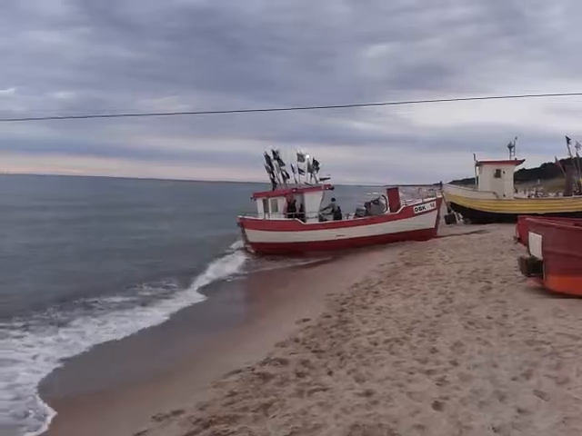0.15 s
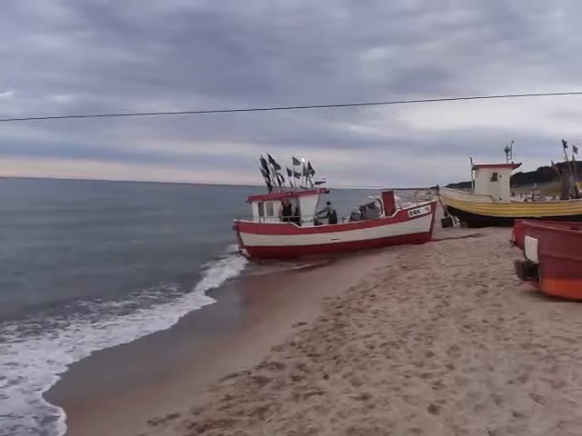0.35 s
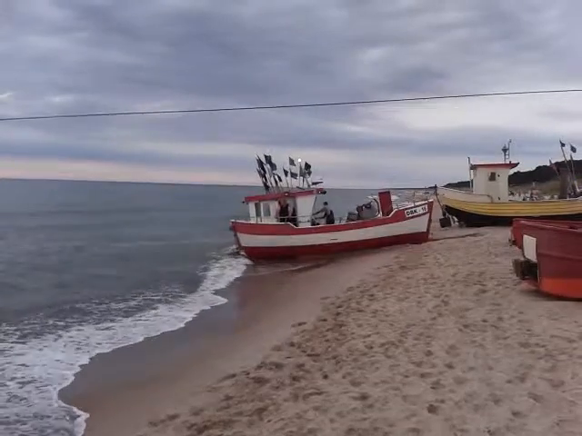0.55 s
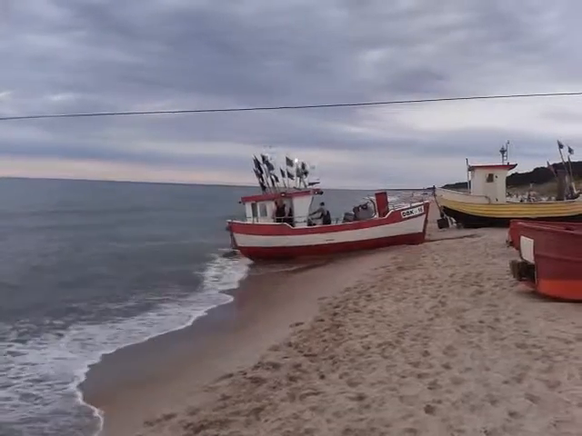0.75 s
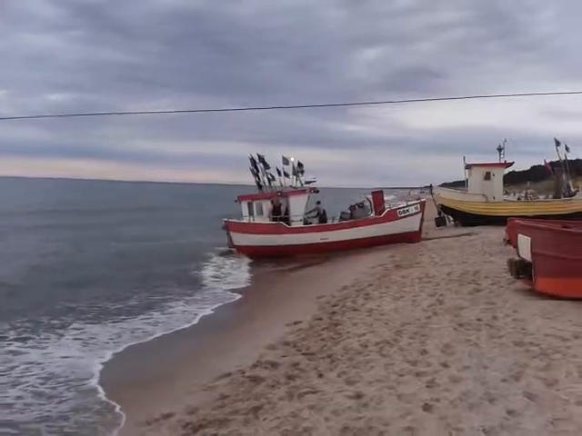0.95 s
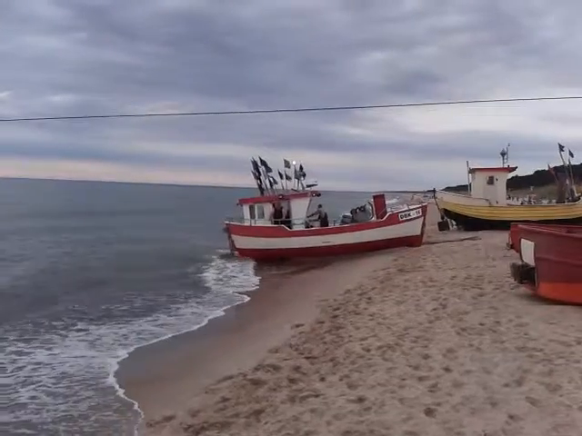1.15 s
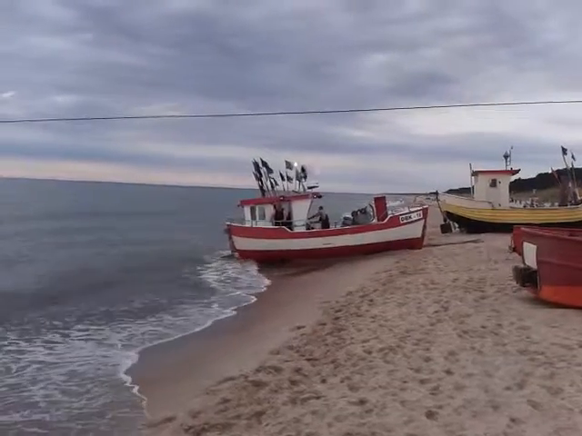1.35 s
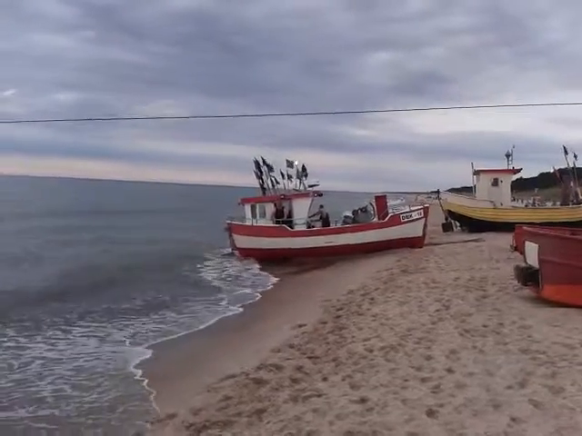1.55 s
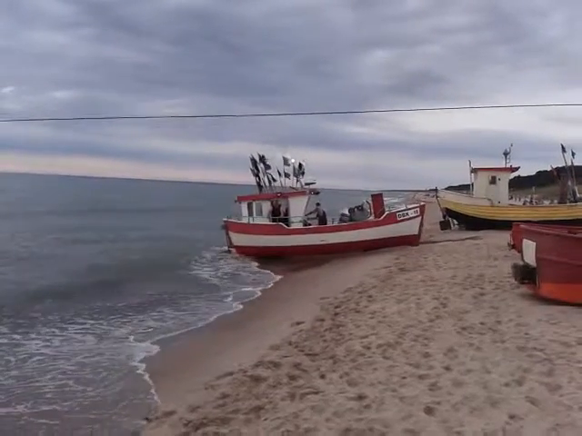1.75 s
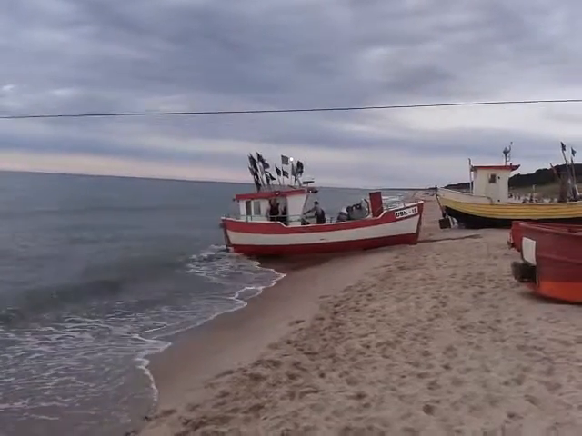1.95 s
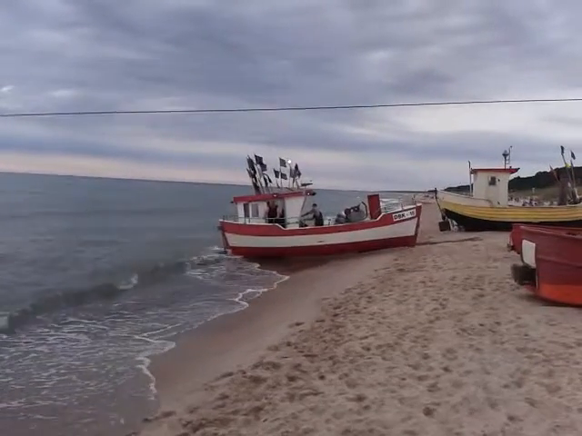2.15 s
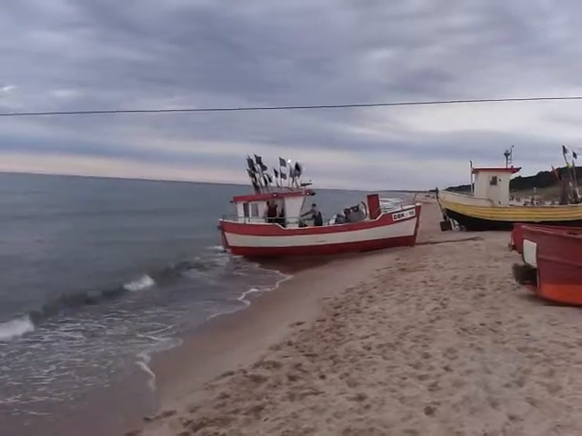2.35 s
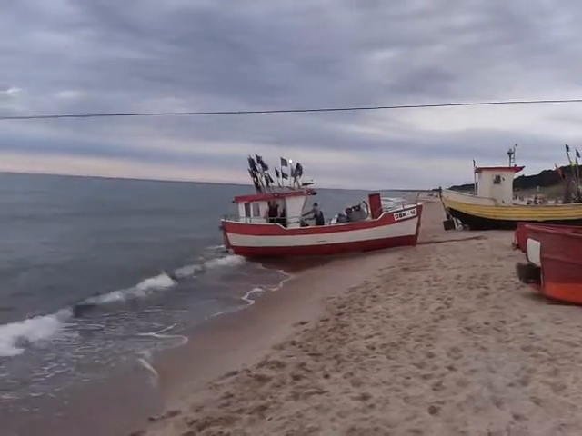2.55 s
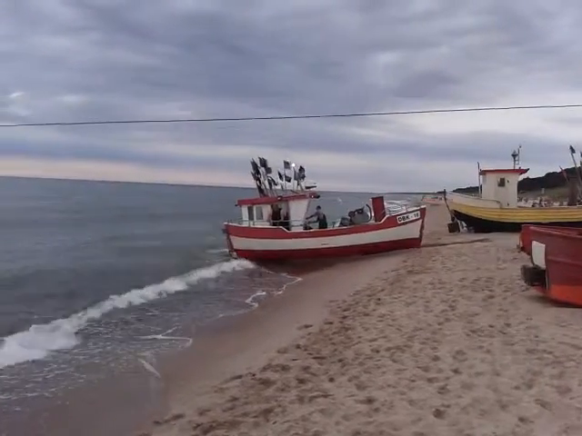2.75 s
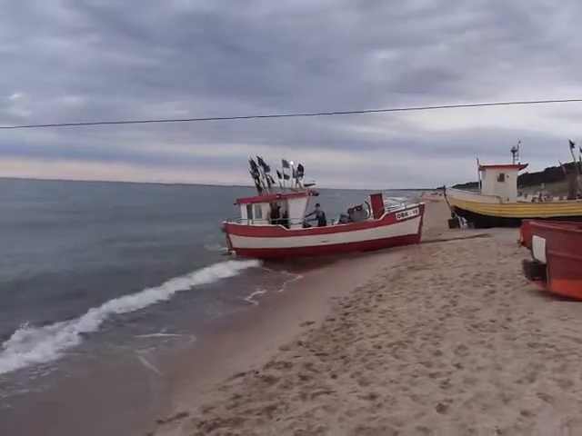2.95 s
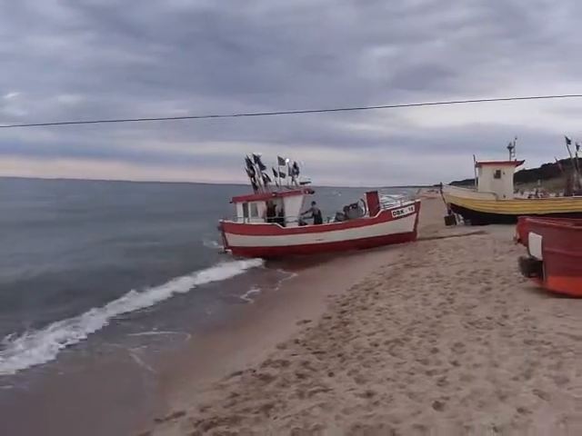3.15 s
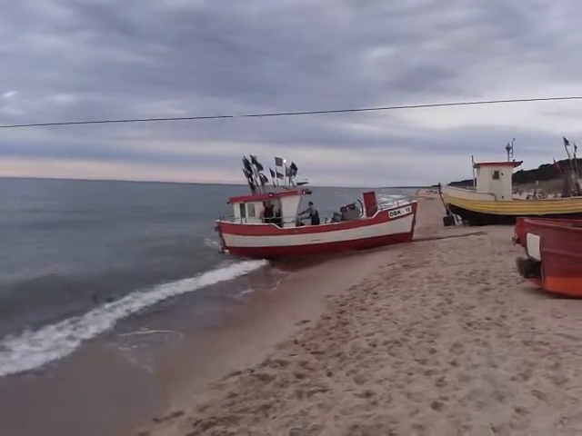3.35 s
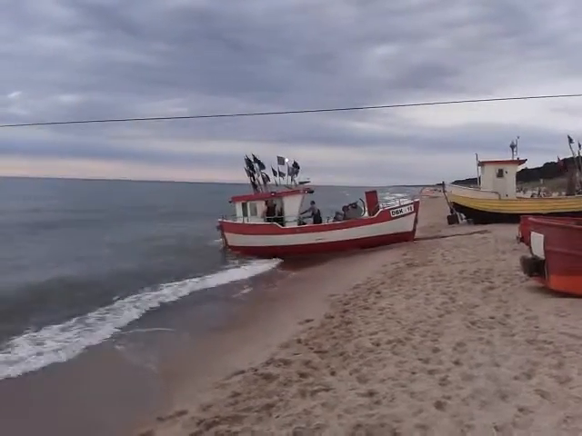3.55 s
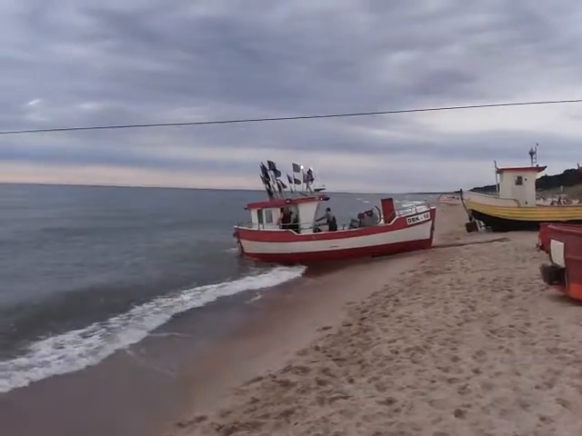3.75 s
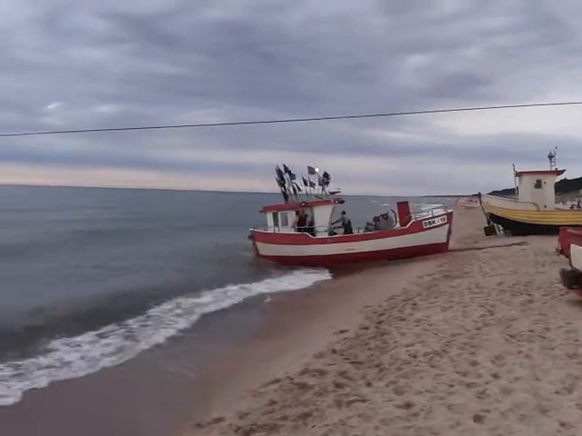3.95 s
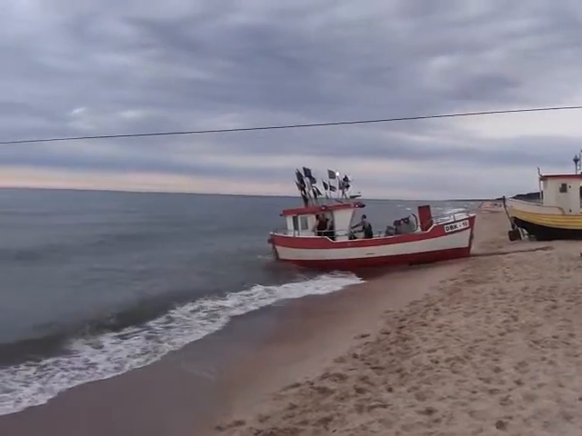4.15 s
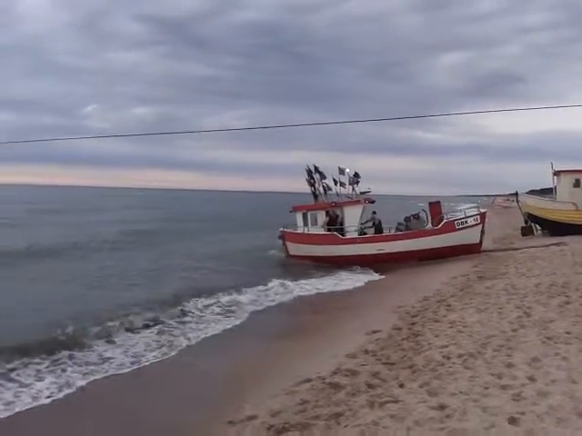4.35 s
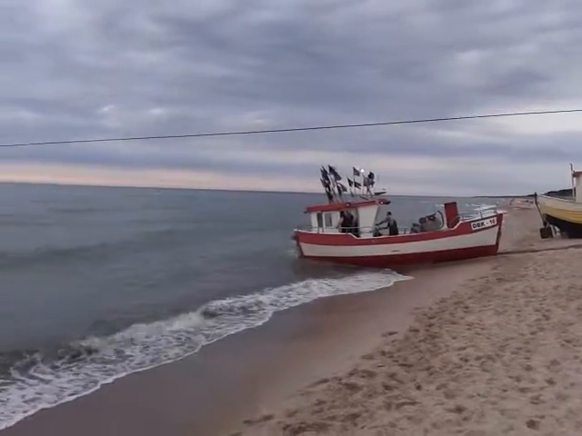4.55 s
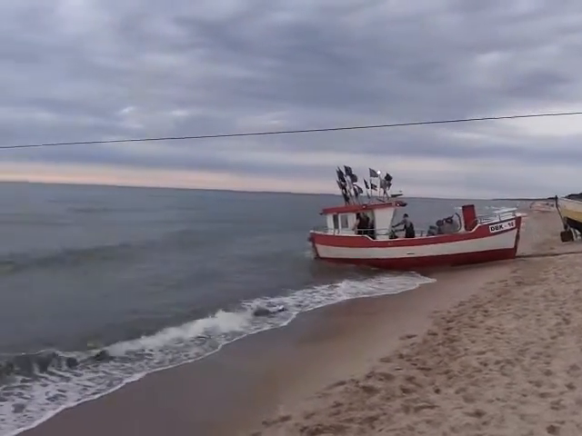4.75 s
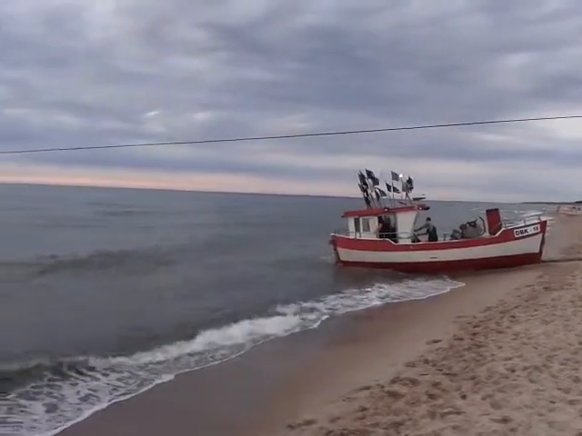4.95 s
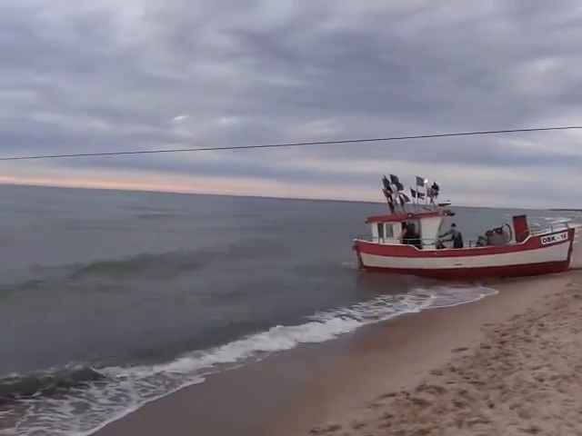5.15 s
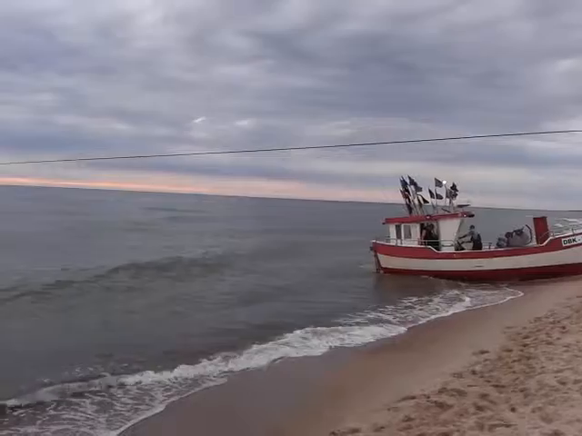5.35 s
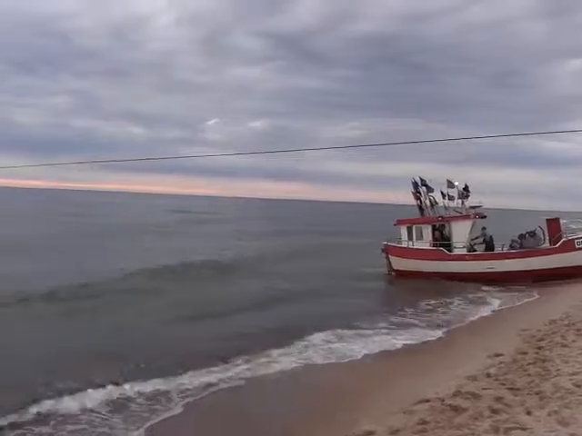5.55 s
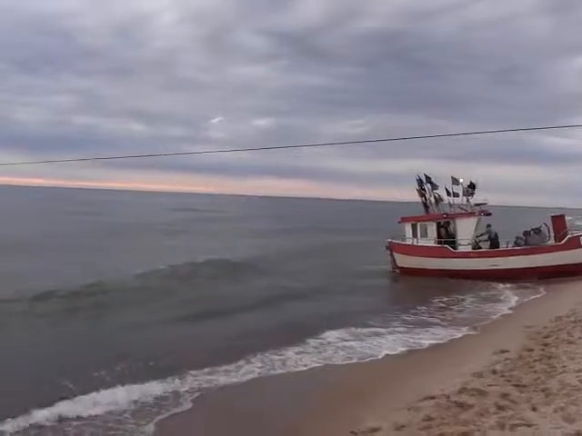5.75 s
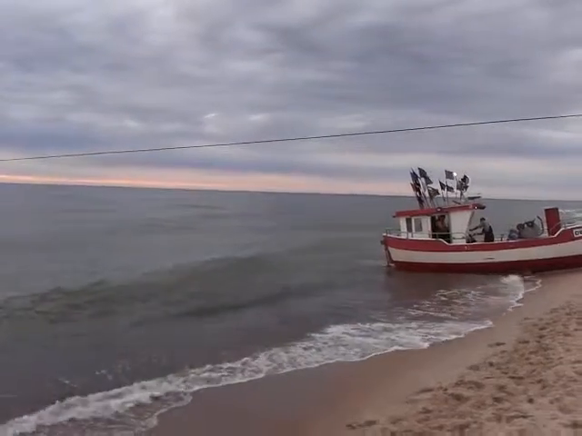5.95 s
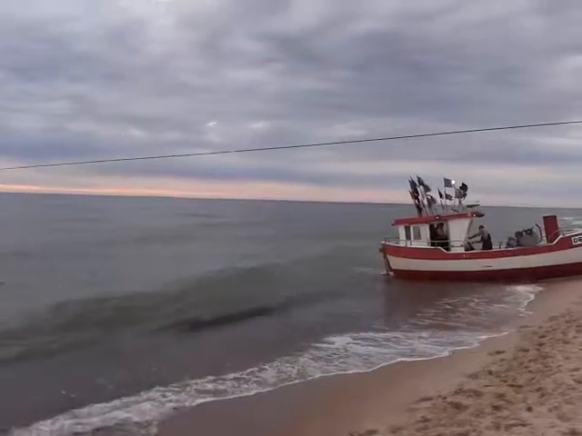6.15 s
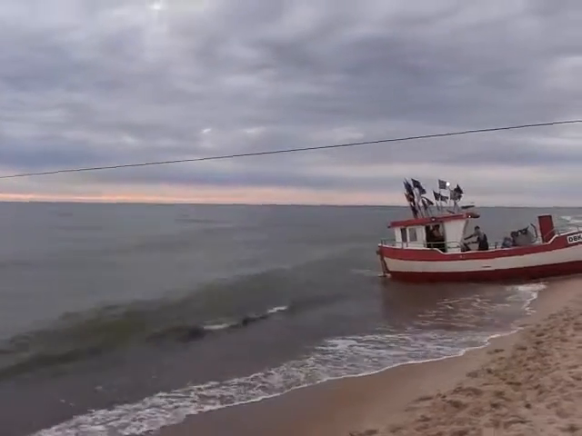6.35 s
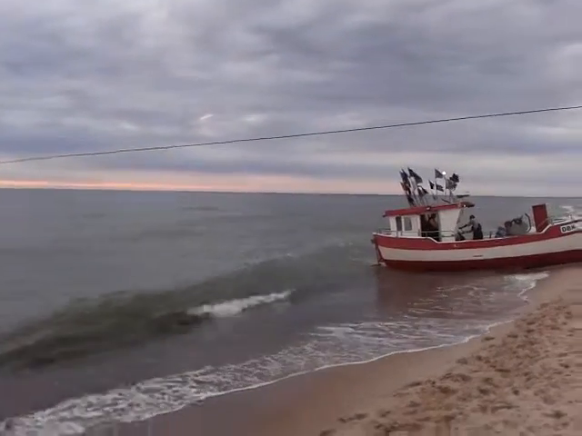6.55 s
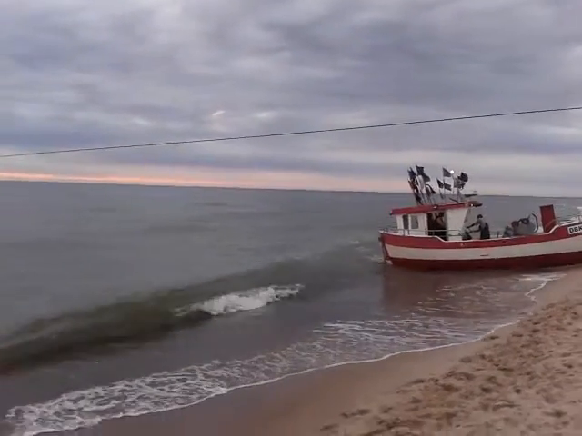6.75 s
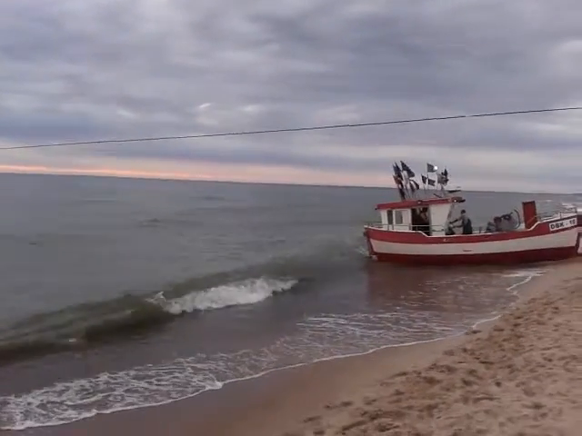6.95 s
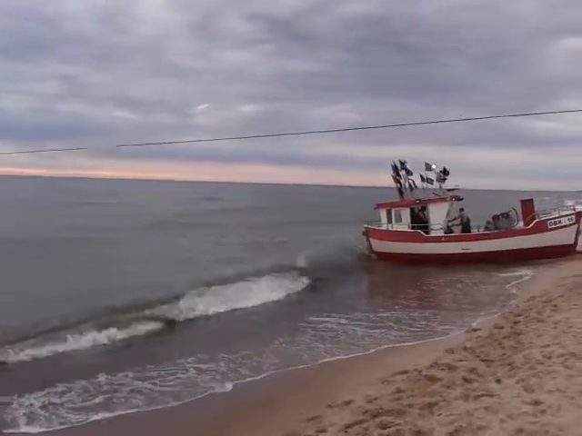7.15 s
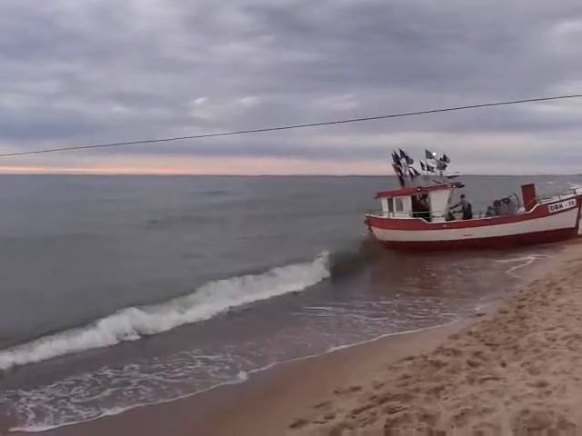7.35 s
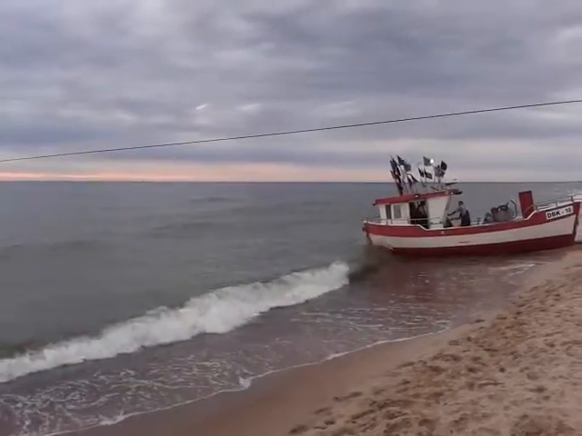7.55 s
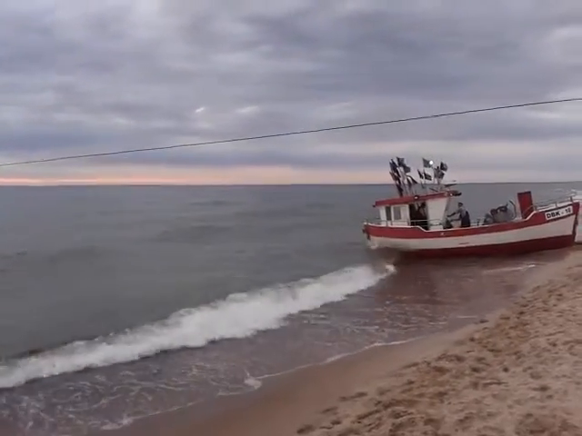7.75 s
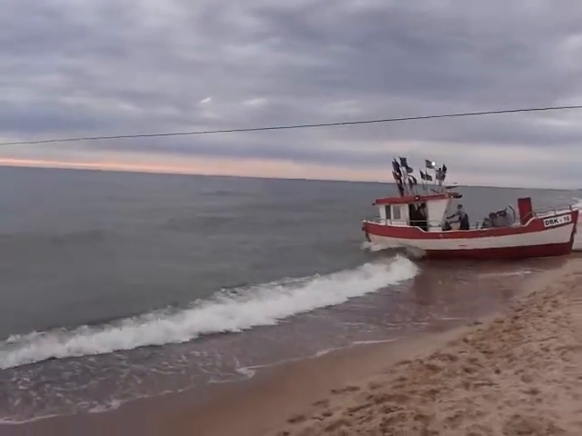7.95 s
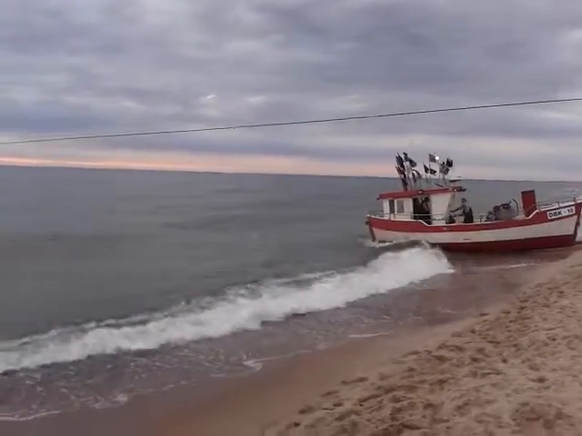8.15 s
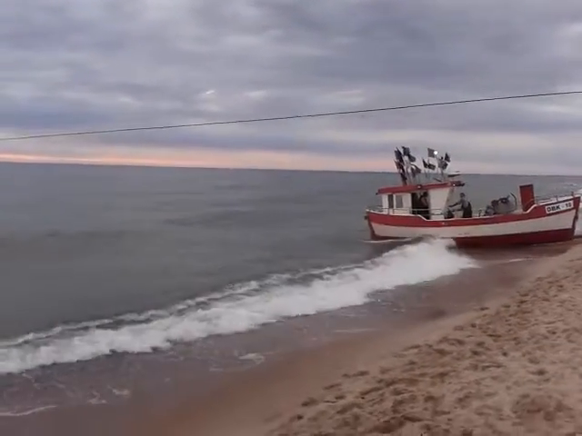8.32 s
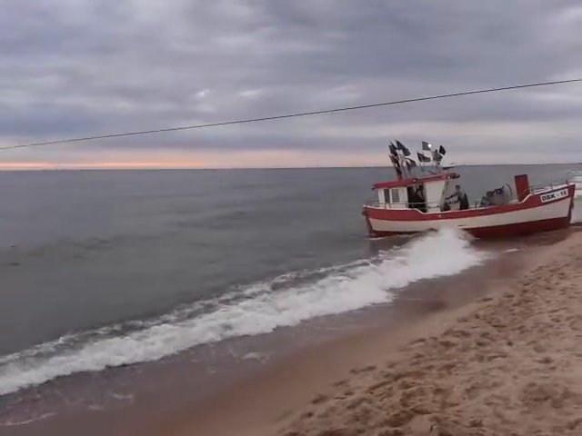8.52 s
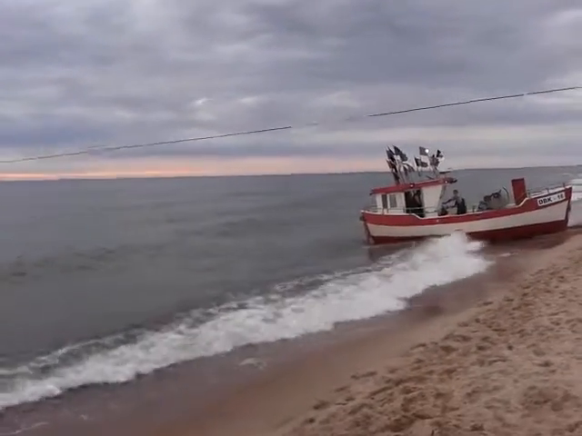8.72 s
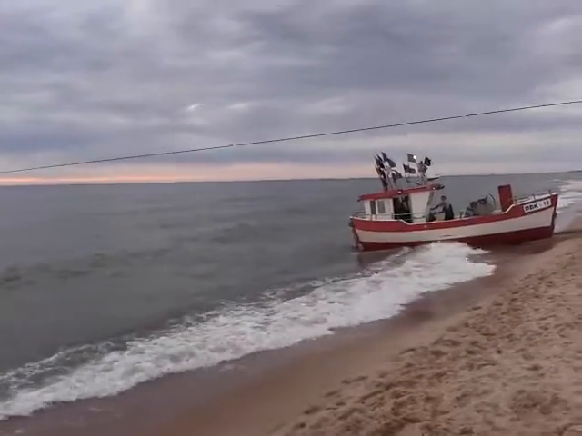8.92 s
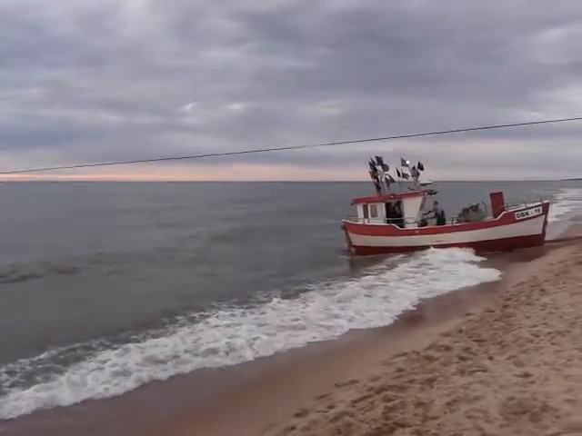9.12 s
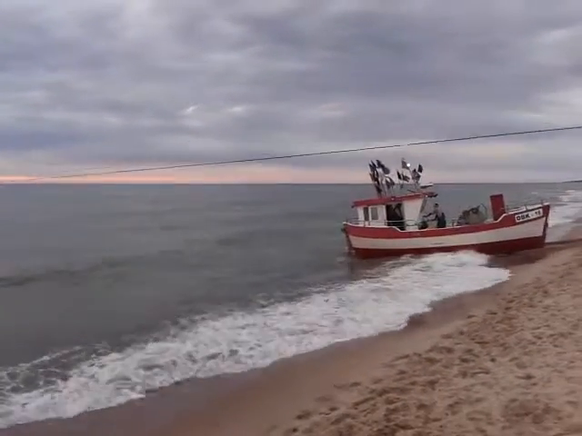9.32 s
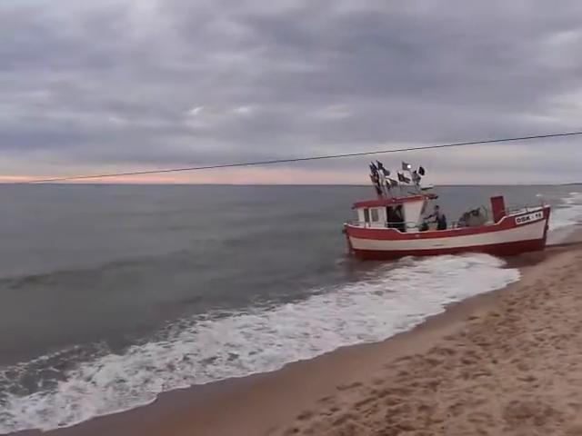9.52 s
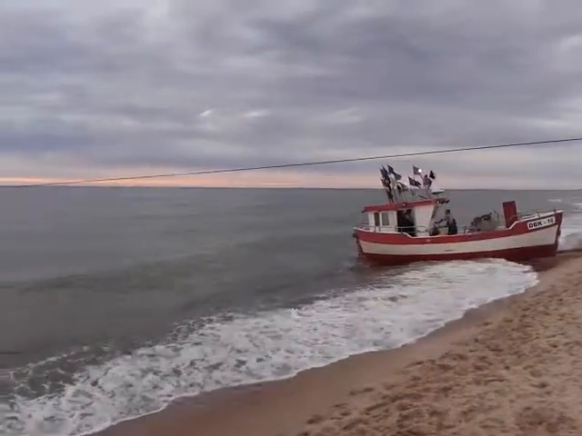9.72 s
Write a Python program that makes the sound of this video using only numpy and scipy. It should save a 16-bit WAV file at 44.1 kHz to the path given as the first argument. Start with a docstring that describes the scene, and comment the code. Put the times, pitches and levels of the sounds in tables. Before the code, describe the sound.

Outdoors on a sandy beach, a small microphone hears modest waves and wind. From 0 to 2 seconds the surf is quiet, a patchy, airy hiss with a soft roar, touched by a few light wind puffs and dull bumps. At about 2.3 seconds comes a sharper puff; from 2.7 to 3.4 a wave breaks in a fuller wash, then drains away, with a cluster of wind thumps around 3.2 to 3.6. After a short lull, wind strikes the microphone from just after 4 seconds: dense, uneven buffeting, hollow low-mid knocks, fluttering and small snaps, far louder than before. Gusts continue almost without pause. Another breaker swells around 6.6 to 8.5, its hiss partly masked, then recedes. Battering lasts until about 9.6, easing slightly at the end. A very faint deep rumble lies underneath; the sound is centred, thin-bassed and slightly ringing in the treble.

```python
"""Small waves break and run up a sandy beach: bands of patchy noise roar, hiss and drain away.
From the fourth second the small microphone faces the wind, after only a few earlier puffs;
random jolts and swinging thumps are the eddies on its port, over a faint deep rumble.
One capsule feeds both channels; its port rings near 3.5 and 5.4 kHz and the bass is cut."""
import sys
import numpy as np
from scipy import signal
from scipy.fft import rfft, irfft
from scipy.io import wavfile
from scipy.ndimage import uniform_filter1d

SR = 44100
rng = np.random.default_rng(int(sys.argv[2]) if len(sys.argv) > 2 else 0)


def put_to_file(sound):
    """Save the sound as 16-bit audio at rate SR, in the file named by the first command-line argument."""
    columns = np.atleast_2d(sound).T  # one column per channel
    safe = np.clip(columns, -1, 1)
    whole_steps = np.round(safe * 32767)
    wavfile.write(sys.argv[1], SR, whole_steps.astype(np.int16))


N = 435708

BASS_CUT_HZ = 128   # for all wind on the port


def from_db(db):
    """Decibels to gain."""
    return 10 ** (np.asarray(db) / 20)


def rms_one(x):
    """Scale to unit power."""
    return x / np.sqrt(np.mean(x ** 2) + 1e-20)


def in_time(rows):
    """Each column of a curve, sample by sample."""
    s, *columns = np.transpose(rows)
    return [np.interp(np.arange(N) / SR, s, c) for c in columns]


def butter(x, hz, kind, order):
    """Causal Butterworth filter."""
    return signal.sosfilt(signal.butter(order, hz, kind, fs=SR, output="sos"), x)


def drift(rate_hz):
    """Slow chance: noise at every 20th sample through a double one-pole low-pass; rms about 1."""
    r = np.exp(-2 * np.pi * rate_hz * 20 / SR)
    noise = rng.standard_normal(N // 20 + 4002)
    slow = signal.lfilter([1], [1, -2 * r, r * r], noise)[4000:]   # skip the settling
    return np.interp(np.arange(N) / 20, np.arange(len(slow)), rms_one(slow))


def wind_level():
    """Wind level in dB: each gust rises fast, holds and falls back into the steady wind."""
    # steady wind on the port, between the gusts: start_s [s], level_db [dB]
    steady_wind = [(0.0, -38), (0.15, -34), (0.7, -38), (1.7, -41), (2.3, -43), (2.78, -25.5),
                   (3.05, -28.5), (3.6, -36), (4.2, -62), (4.35, -25.5), (5.0, -23.5), (5.5, -22.5),
                   (6.05, -28), (6.4, -42), (6.9, -26), (7.5, -29), (8.0, -25), (9.3, -19.5), (9.74, -26),
                   (9.88, -23.5)]
    # gusts: start_s [s], hold_s [s], start_db [dB], end_db [dB]
    gusts = [(0.758, 0.087, -37, -35), (1.782, .03, -34.5, -52), (1.997, 0.05, -34, -33.5),
             (2.274, 0.017, -24.5, -43), (3.111, .01, -17.5, -29), (3.443, 0.1, -29, -29),
             (3.8, .02, -44, -50), (4.054, 0.064, -29, -47), (4.21, 0.11, -34.5, -22.5),
             (4.412, 0.14, -41, -18), (4.554, 0.18, -19, -29), (4.757, 0.096, -22, -15.5),
             (5.066, 0.077, -26, -15), (5.188, 0.16, -22, -19.5), (5.474, 0.24, -26, -20),
             (5.75, 0.1, -22.5, -18), (5.927, 0.071, -20.5, -18.5), (6.077, 0.25, -20, -21),
             (6.414, 0.17, -17, -23.5), (6.567, 0.29, -18.5, -28.5), (6.934, 0.21, -23.5, -22),
             (7.174, 0.308, -18.5, -18), (7.533, 0.26, -14, -19.5), (7.848, 0.057, -14, -20.5),
             (7.947, 0.41, -13, -23), (8.315, 0.2, -24, -16.5), (8.585, 0.074, -18, -14.5),
             (8.747, 0.16, -17, -16.5), (9.05, 0.14, -20, -16.5), (9.342, 0.022, -16, -31),
             (9.4, 0.14, -20, -18), (9.54, 0.12, -22.5, -22.5)]
    rise_db_per_s, fall_db_per_s = 497, 348
    t = np.arange(0, N, 20) / SR
    power = 0
    for start_s, hold_s, start_db, end_db in gusts:
        held_db = np.interp(t, [start_s, start_s + max(hold_s, 1e-3)], [start_db, end_db])
        before_db = rise_db_per_s * np.maximum(start_s - t, 0)
        after_db = fall_db_per_s * np.maximum(t - start_s - hold_s, 0)
        power = power + from_db(2 * (held_db - before_db - after_db))   # doubled dB: power
    power = np.interp(np.arange(N) / SR, t, power) + from_db(2 * in_time(steady_wind)[0])
    return 10 * np.log10(power)


def rumble():
    """A faint deep rumble under everything: low noise that grows with the wind."""
    level_db = uniform_filter1d(wind_level(), size=SR // 12)
    deep = butter(rng.standard_normal(N), [16, 48], "band", order=2)
    return from_db(-67 + 0.33 * (level_db + 20)) * rms_one(deep)   # -67 dB in a -20 dB wind


def ringing():
    """Soft jolts at random, dealt to ten short resonances spread over the wind's range; rms 1."""
    jolts_per_s, decay_cycles = 110, 8.8   # cycles to fall 60 dB
    passing = rng.random(N) < jolts_per_s / SR
    jolts = passing * from_db(2.46 * rng.standard_normal(N)) * rng.choice([-1, 1], N)
    dealt = rng.integers(0, 10, N)
    out = 0
    for k, hz in enumerate(np.geomspace(280, 850, 10)):
        r = from_db(-60 * hz / (decay_cycles * SR))
        w = 2 * np.pi * hz / SR
        rung = signal.lfilter([np.sin(w)], [1, -2 * r * np.cos(w), r * r], jolts * (dealt == k) + 1e-18)
        out = out + butter(rung, 1.93 * hz, "low", order=2)
    return rms_one(out)


def buffeting():
    """Turbulence: eddies pass the port as clumped, uneven pressure jolts; small eddies sound higher."""
    # large to small eddies: top_hz [Hz], level_db [dB], gust_lift [dB per dB of gust]
    eddy_sizes = [(290, -0.5, 0), (480, 2, -0.5), (740, -5.5, 1.1), (1130, -10.5, 0.42)]
    # slow air sheds more large, deep eddies: start_s [s], large_db [dB above the usual]
    large_eddies = [(0, -19), (0.8, -13), (2.2, 12), (2.8, -14), (3.5, -3), (4, 20), (4.6, 5), (6.2, 3),
                    (7.5, 3), (8.8, -6.5), (9.88, 8)]
    eddies_per_s, low_cut_hz, ringing_db = 650, 304, 4   # typical rate; ringing in the strongest wind
    level_db = wind_level()
    large_db, = in_time(large_eddies)
    sizes = from_db(0.84 * np.minimum(rng.exponential(1, N), 4)) * rng.choice([-1, 1], N)
    passing = rng.random(N) < eddies_per_s * from_db(3.0 * drift(50)) / SR
    jolts = sizes * passing + 1e-18
    kind = rng.integers(0, len(eddy_sizes), N)
    gust_db = level_db - uniform_filter1d(level_db, size=SR // 2)   # above the half-second mean
    eddies = 0
    for k, (top_hz, size_db, gust_lift) in enumerate(eddy_sizes):
        of_this_size = rms_one(butter(jolts * (kind == k), top_hz, "low", order=4))
        # gusts sharpen the small eddies
        eddy_db = size_db + large_db * (k == 0) + gust_lift * gust_db + 2.0 * drift(8.9)
        eddies = eddies + from_db(eddy_db) * of_this_size
    # a light breeze hardly rings
    eddies = eddies + from_db(ringing_db + 0.38 * (level_db - level_db.max())) * ringing()
    eddies = butter(eddies, low_cut_hz, "high", order=2)
    return from_db(level_db) * rms_one(butter(eddies, BASS_CUT_HZ, "high", order=3))


def thumps():
    """A strong eddy swings the diaphragm through a cycle or two, with a short snap at its peak."""
    # strongest single eddies, ahead of the bass cut:
    # start_s [s, near the peak], peak_db [dB], pitch_hz [Hz], snap_db [dB above the peak]
    strong_eddies = [(0.575, -21, 480, -6), (0.758, -19, 320, -14), (0.841, -22.5, 230, -27),
                     (0.849, -17, 420, -20), (1.521, -27, 260, -20), (1.78, -22, 262, -11),
                     (1.831, -22, 432, -12), (1.95, -21, 290, -13), (2.014, -16, 272, -11),
                     (2.033, -26, 525, -8), (2.271, -10, 393, -14), (3.224, -9.5, 324, -15),
                     (3.315, -3, 476, -28), (3.452, -10.5, 447, -32), (3.475, -8, 490, -25),
                     (3.509, -5, 373, -31), (3.557, -13, 410, -43), (3.567, -12, 480, -6),
                     (3.583, -16, 352, -36), (3.775, -23, 194, -31), (3.795, -17.5, 340, -12),
                     (4.04, -8, 390, -17), (4.104, -21, 276, -23), (4.245, -6, 354, -16),
                     (4.259, -4.5, 315, -21), (4.316, -5, 533, -17), (4.358, -8, 590, -30),
                     (4.398, -4.5, 322, -21), (4.457, -0.5, 367, -27.5), (4.477, -6, 480, -28),
                     (4.646, -4, 366, -9), (4.692, -9, 630, -19), (4.775, -2, 398, -9),
                     (4.793, -10, 595, -23), (4.843, -7, 600, -30), (5.021, -9, 650, -24),
                     (5.028, -2, 350, -14), (5.066, -1, 516, -15), (5.123, -6, 340, -10),
                     (5.137, 4.5, 376, -22), (5.166, -1.5, 490, -22), (5.19, -5, 660, -20),
                     (5.276, -1, 525, -21), (5.318, -11, 515, -24), (5.418, -6, 648, -30),
                     (5.468, -2, 380, -19), (5.507, 1, 443, -19), (5.635, -5, 580, -14),
                     (5.758, 0, 336, -14), (5.818, -7, 441, -15), (5.841, 1.5, 547, -15),
                     (5.934, -7, 475, -20), (5.958, -11, 467, -20), (6.08, -12, 605, -20),
                     (6.108, -5, 555, -16), (6.147, -4, 595, -19), (6.187, -3, 540, -15),
                     (6.206, -6, 546, -13), (6.305, -12, 540, -20), (6.317, -5.5, 700, -29),
                     (6.406, -1, 500, -18), (6.441, 0, 787, -18), (6.466, -0.5, 432, -10),
                     (6.51, -5, 384, -19), (6.542, -3, 380, -22), (6.604, -3, 512, -32),
                     (6.65, -4, 442, -20), (6.688, -9, 500, -23), (6.763, -6, 364, -20),
                     (6.958, -10, 494, -11), (7.033, -7, 425, -20), (7.19, -1, 460, -19),
                     (7.24, -6, 551, -14), (7.312, -7, 711, -6), (7.39, -3.5, 510, -13),
                     (7.423, -6, 630, -15), (7.454, -2.5, 480, -30), (7.539, -7, 377, -30),
                     (7.563, -8, 501, -19), (7.634, 0, 501, -27), (7.711, -8, 680, -29),
                     (7.755, -8, 656, -4), (7.771, -2, 463, -10), (7.789, 2, 590, -27),
                     (7.884, -7, 476, -19), (7.955, -2, 420, -30), (7.982, -8, 445, -8), (8.0, 0, 450, -22),
                     (8.053, -10, 469, -11), (8.161, -6, 958, 4), (8.209, -2.5, 448, -20),
                     (8.266, -2.5, 640, -9), (8.352, -6, 577, -24), (8.401, -3.5, 787, -11),
                     (8.456, -5, 528, -28), (8.508, -7, 507, -18), (8.533, -8, 427, -18),
                     (8.587, -7, 458, -20), (8.6, -10, 779, -18), (8.625, -4, 590, -17),
                     (8.662, -5, 441, 0), (8.751, -5, 816, -16), (8.8, -6, 464, -18), (8.826, -3, 368, -7),
                     (8.853, -9, 393, -27), (8.883, -5, 414, -18), (8.908, -8, 612, -7),
                     (8.938, -4, 595, -17), (8.967, -1, 710, -22), (8.993, -4, 501, -21),
                     (9.076, -10, 493, -9), (9.166, -2, 557, -14), (9.189, -10, 612, -26),
                     (9.221, -1.5, 626, -26), (9.249, 2.5, 510, -7), (9.331, -5, 479, -30),
                     (9.341, -5, 480, -1), (9.4, -4, 565, -22), (9.415, -2, 760, -21), (9.425, -4, 500, -4),
                     (9.513, -10, 582, -13), (9.541, -5, 475, -33), (9.576, -5, 507, -29)]
    snap_hz = 1160
    out = np.zeros(N + 2000)
    t = np.arange(-500, 1500) / SR
    chances = rng.random((len(strong_eddies), 2))
    for (start_s, peak_db, hz, snap_db), (turn, push) in zip(strong_eddies, chances):
        stretch = from_db(max(-0.45 * (snap_db + 25), -2.0))   # dull ones last longer
        cycles = t * hz / np.where(t < 0, .4, .8) / stretch   # it builds faster than it dies
        swing = np.exp(-np.abs(cycles) ** 1.22) * np.cos(2 * np.pi * hz * t + 1.1 * (turn - .5))
        snap_shape = np.exp(-(t * snap_hz / 0.69) ** 2)
        snap = snap_shape * np.cos(2 * np.pi * snap_hz * t + 1.2 * (turn - .5))
        at = round(start_s * SR)
        out[at:at + 2000] += np.sign(push - .5) * from_db(peak_db) * (swing + from_db(snap_db) * snap)
    return butter(out[550:N + 550], BASS_CUT_HZ, "high", order=3)   # peaks 50 samples early


def foam():
    """Hiss, roar, treble and ring of the surf; the hiss briefly swells or dips, then settles back."""
    # the surf, levels relative: start_s [s], hiss_db [dB], roar_db [dB],
    # treble_db [dB, extra level of the hiss above 8 kHz], upper port ring_hz [Hz]
    surf_levels = [(0.0, -31.5, -37.5, 1, 5380), (0.5, -33.5, -37.5, 2, 5500),
                   (1.2, -34.5, -39.5, 0.5, 5330), (2.06, -30, -34, 0, 5310), (2.45, -27, -28.5, 0, 5310),
                   (2.7, -20.5, -25, 0, 5330), (3.3, -20.5, -25.5, 1, 5320), (3.8, -28.5, -35, -1.5, 5300),
                   (4.21, -34, -40.5, -3.5, 5490), (4.56, -30.5, -42.5, -3, 5500),
                   (4.98, -32.5, -36.5, -2, 5500), (5.5, -27, -32, -5.5, 5500),
                   (6.1, -27.5, -32, -4.5, 5370), (6.6, -24.5, -29.5, -3, 5330), (7.1, -21, -26, 0, 5410),
                   (8.5, -24.5, -28, -1, 5660), (9.1, -31, -38, -5.5, 5620), (9.5, -27.5, -35, -8.5, 5600),
                   (9.82, -33, -40, -1, 5280), (9.88, -28.5, -35, -2, 5530)]
    # brief swells and one dip of the hiss: peak_s [s], change_db [dB]
    hiss_changes = [(2.26, 9), (2.8, 1), (4.04, 2.5), (4.54, 1.5), (4.61, 2), (5.01, 4.5), (5.09, 2.5),
                    (6.8, -2), (8.78, 2.5)]
    rise_s, fade_s = 0.039, 0.14
    hiss_db, *rest = in_time(surf_levels)
    t = np.arange(N) / SR
    for peak_s, change_db in hiss_changes:
        rise = np.clip(1 + (t - peak_s) / rise_s, 0, 1)
        fade = np.exp(-np.abs(t - peak_s) / fade_s)
        hiss_db = hiss_db + change_db * np.where(t < peak_s, rise, fade)
    return hiss_db, *rest


def surf():
    """Countless bursting bubbles: noise in overlapping bands, each coloured and patchy in its own way."""
    # surf as the capsule colours it: pitch_hz [Hz], colour_db [dB, relative]
    foam_colour = [(35, -74), (60, -29), (123, -16.5), (231, -25), (521, 0), (673, -4.5), (810, 1),
                   (889, -4), (1700, -4), (2530, -14), (3500, -2.5), (4420, -10.5), (5320, 2.5),
                   (6870, -15), (8000, -16.5), (9800, -22.5), (11500, -26.5), (15500, -38.5)]
    # the lower port ring swells and sinks against the upper, and the dip below it wanders:
    # start_s [s], lower_db [dB], dip_hz [Hz]
    lower_ring = [(0, -1, 2570), (1.07, 3.5, 2640), (1.84, 0, 2390), (2.72, -1.5, 2520), (3.3, -2, 2640),
                  (4.2, 1, 2550), (4.4, -1.5, 2530), (4.65, 0, 2570), (4.9, 1.5, 2480), (5.15, 2.5, 2640),
                  (5.3, 0, 2600), (6.4, -2, 2550), (7.1, 0.5, 2520), (8.8, 1.5, 2530), (9.05, 3, 2660),
                  (9.3, -0.5, 2940), (9.88, 1, 3000)]
    roar_top_hz, hiss_hz, treble_hz = 1830, 2940, 11600   # treble_db counts in full at treble_hz
    usual_dip_hz, lower_ring_hz, usual_ring_hz = 2530, 3670, 5330
    hiss_db, roar_db, treble_db, ring_hz = foam()
    lower_db, dip_hz = in_time(lower_ring)
    pitch = np.log(np.fft.rfftfreq(N, 1 / SR) + 1)
    foam_hz, foam_db = np.transpose(foam_colour)
    # single bursts stand out a little from the mass
    bursts = rfft(rng.standard_normal(N) * from_db(1.0 * drift(720) + 0.6 * drift(12)))
    low_hz, high_hz = np.geomspace(40, 1800, 12), np.geomspace(2100, 7500, 17)
    centres = np.log(np.r_[low_hz, high_hz, 8500, 9500, 10600, 12000, 13500, 15500])
    # the port's peaks and dips slide as the microphone turns
    ring_slide, dip_slide = np.log(ring_hz / usual_ring_hz), np.log(dip_hz / usual_dip_hz)
    together_db = 0.35 * drift(6)   # shared by all bands
    out = 0
    for centre, share in zip(centres, np.eye(len(centres))):
        band = irfft(bursts * np.interp(pitch, centres, share), N)
        # low bands roar, high bands hiss, the highest follow treble_db
        roar = np.interp(centre, np.log([roar_top_hz, hiss_hz]), [1, 0])
        treble = np.clip((centre - np.log(8000)) / np.log(treble_hz / 8000), 0, 2.5)
        level_db = roar * (roar_db + 17.5) + (1 - roar) * (hiss_db + 11.0) + treble * treble_db
        upper = np.interp(centre, np.log([usual_dip_hz, usual_ring_hz]), [0, 1])
        slid_centre = centre - upper * ring_slide - (1 - upper) * dip_slide
        colour_db = np.interp(slid_centre, np.log(foam_hz), foam_db)
        colour_db = colour_db + lower_db * np.exp(-((centre - np.log(lower_ring_hz)) / 0.19) ** 2)
        patchy_db = 0.73 * drift(10.4)
        out = out + band * from_db(level_db + colour_db + together_db + patchy_db)
    return out


def scene():
    """Surf and wind reach the one capsule, which feeds both channels."""
    return np.tile(surf() + buffeting() + thumps(), (2, 1))


def record(dry):
    """Peaks are rounded, the deep bass is cut down to a rumble, the top is cut."""
    ceiling, top_cut_hz = 0.8, 15690
    rounded = ceiling * np.tanh(dry / ceiling)
    with_rumble = butter(rounded, 98, "high", order=3) + rumble()
    top_cut = signal.ellip(12, .5, 70, top_cut_hz, fs=SR, output="sos")
    return signal.sosfilt(top_cut, with_rumble)


dry = scene()
out = record(dry)
put_to_file(out)
```